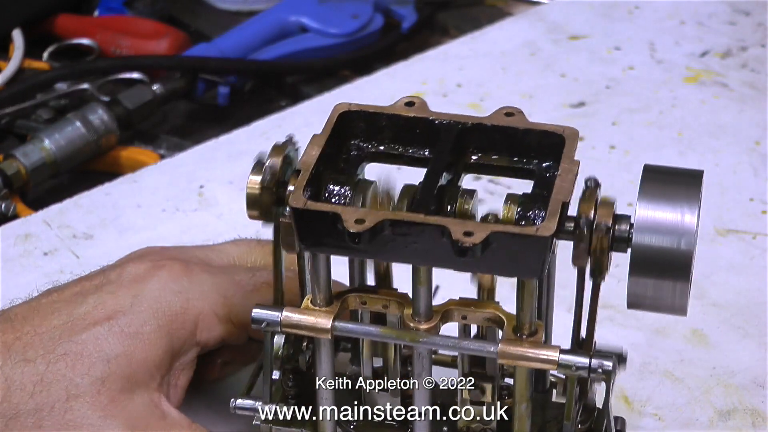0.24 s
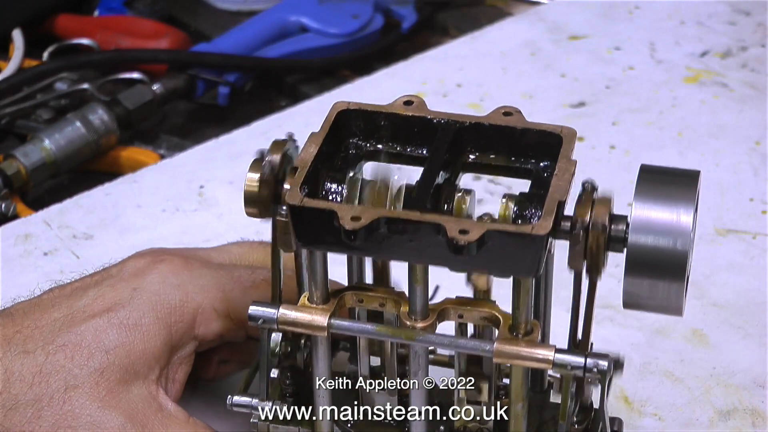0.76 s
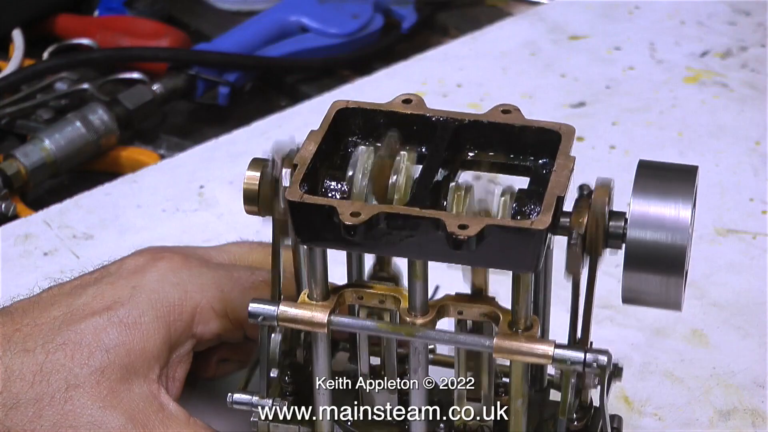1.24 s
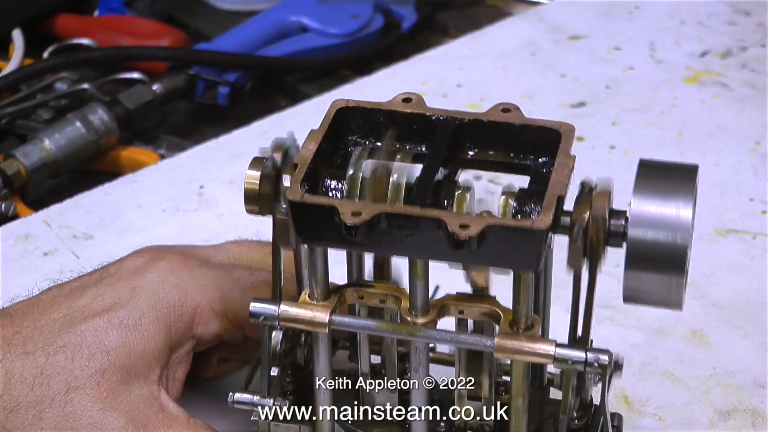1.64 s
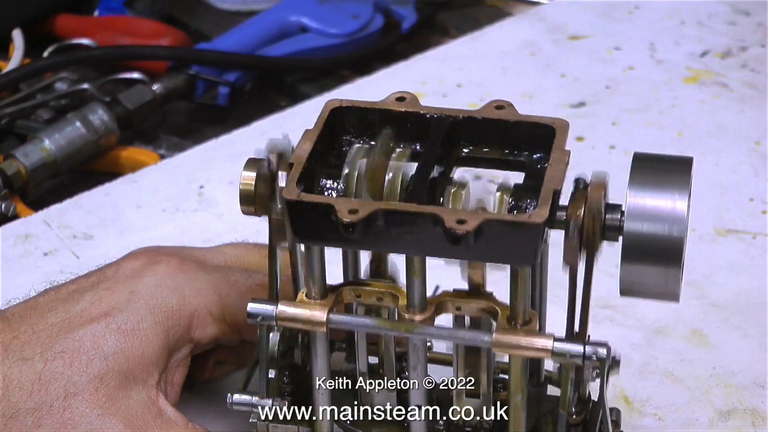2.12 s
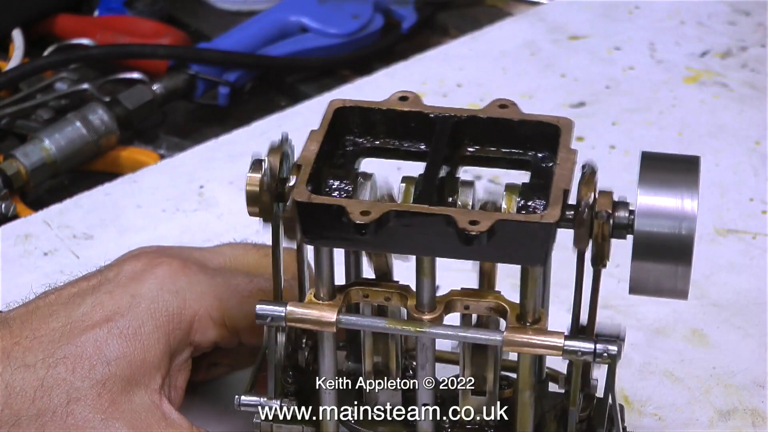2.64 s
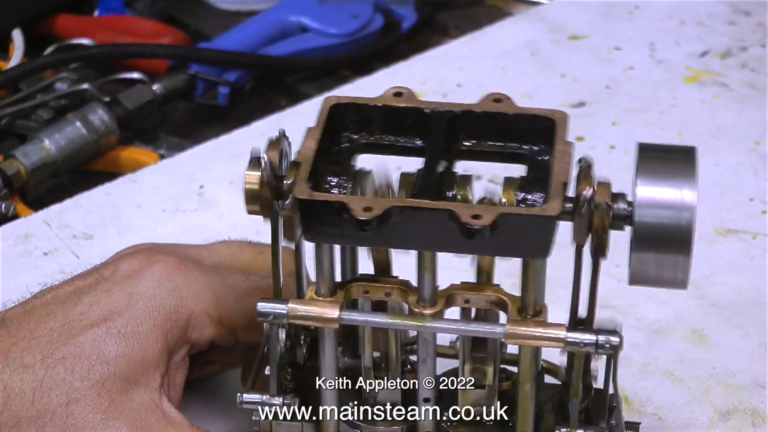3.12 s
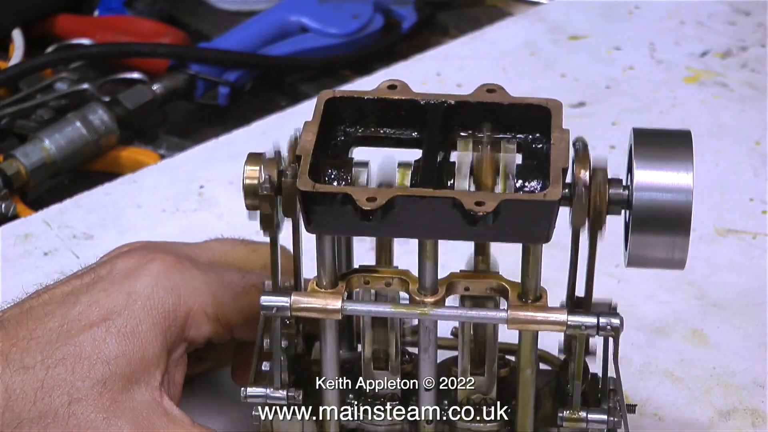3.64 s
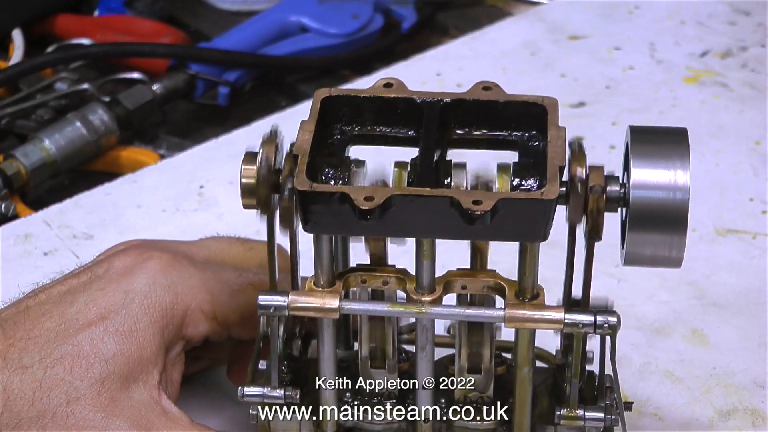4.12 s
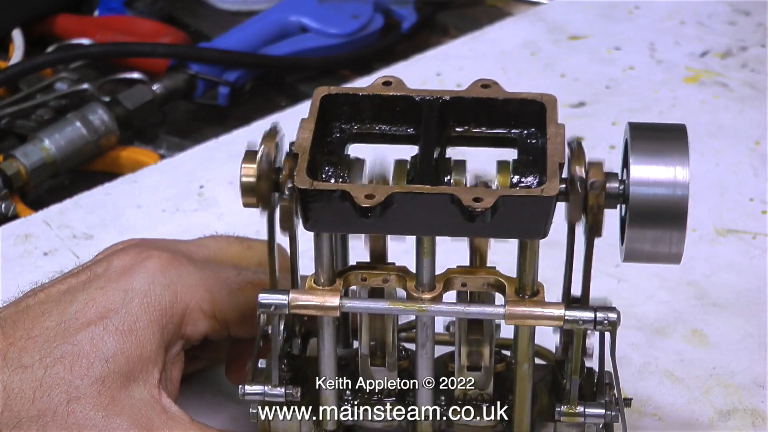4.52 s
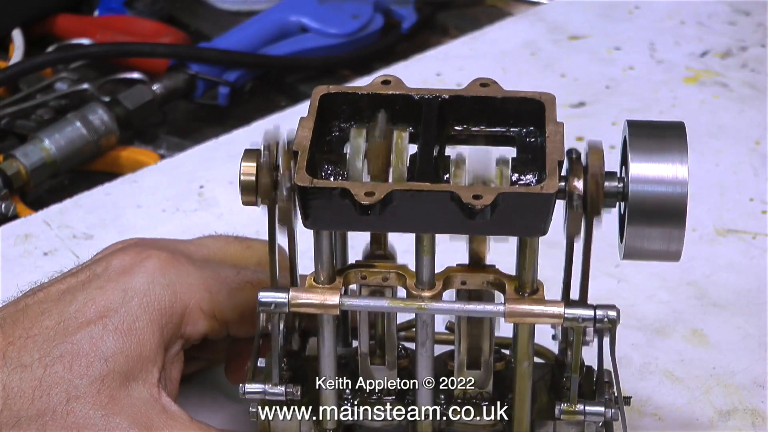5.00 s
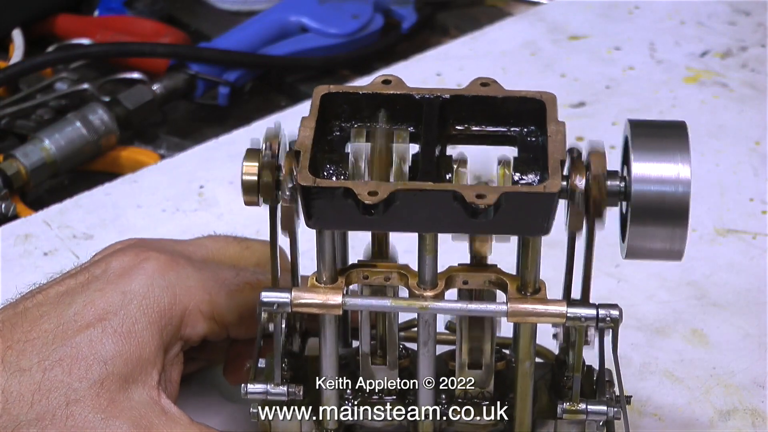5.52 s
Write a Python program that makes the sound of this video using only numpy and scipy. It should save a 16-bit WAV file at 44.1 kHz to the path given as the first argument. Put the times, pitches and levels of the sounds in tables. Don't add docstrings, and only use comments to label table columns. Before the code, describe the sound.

Already running at the start, a model engine spits very fast, bright exhaust puffs over unbroken air hiss, strong and weak beats alternating. Each turn brings two dull bench thumps of changing strength and a brief hollow hoot whose pitch shifts, with a faint thin whistle behind. Close mono pickup in a small workshop, thin in the bass, no start or stop.

```python
import sys
import numpy as np
from scipy import signal
from scipy.io import wavfile
from scipy.ndimage import uniform_filter1d

SR = 44100
rng = np.random.default_rng(int(sys.argv[2]) if len(sys.argv) > 2 else 0)


def linear_from_db(decibels):
    return 10 ** (np.asarray(decibels, float) / 20)


def master(y):
    cut = np.clip(np.atleast_2d(y).T, -1, 1)
    pcm = np.round(cut * 32767)
    wavfile.write(sys.argv[1], SR, pcm.astype(np.int16))


N = 254143


def evened(x):
    return x / np.sqrt(np.mean(x ** 2) + 1e-20)


def add(mix, s, sound):
    at = round(s * SR)
    sound = sound[max(-at, 0):]
    part = mix[max(at, 0):][:len(sound)]
    part += sound[:len(part)]


def resonate(x, hz, width):
    turn = np.exp(2j * np.pi * np.cumsum(hz * np.ones(len(x))) / SR)
    r = np.exp(-np.pi * width / SR)
    return 2 * (turn * signal.lfilter([1 - r], [1, -r], x / turn)).real


def turbulence(points, patchy_db, ripple_db=1.22, stretch=np.ones(N)):
    hz = np.fft.rfftfreq(512, 1 / SR)
    a, b, patches, ripples = rng.standard_normal((N // 128 + 5, 257, 4)).T
    patches = uniform_filter1d(uniform_filter1d(patches, size=6, axis=0), size=8, axis=1)
    ripples = uniform_filter1d(uniform_filter1d(ripples, size=5, axis=0), size=300, axis=1)
    f, db = np.transpose(points)
    at_frames = np.interp(np.arange(a.shape[1]) * 128, np.arange(N), stretch)
    colour = np.interp(np.log((hz[:, None] + 1) / at_frames), np.log(f), db, -90, -90)
    z = (a + 1j * b) * linear_from_db(colour + patchy_db * evened(patches) + ripple_db * evened(ripples))
    return evened(signal.istft(z, nperseg=512, noverlap=384)[1][:N])


def curve(rows, axis, s=np.arange(N) / SR):
    rows = np.array(rows)
    return np.interp(s, rows[:, 0], rows[:, axis])


# t/s, turns completed
CRANK_TURNS = [(0.0, 0), (0.126, 1), (0.243, 2), (0.469, 4), (0.573, 5), (0.98, 9), (1.571, 15),
               (1.862, 18), (2.249, 22), (2.837, 28), (3.323, 33), (3.617, 36), (4.016, 40), (4.42, 44),
               (4.929, 49), (5.341, 53), (5.858, 58)]


def moments(angles):
    s, turns = np.transpose(CRANK_TURNS)
    return np.interp(np.arange(turns[-1])[:, None] + np.array(angles), turns, s)


def overspeed():
    cruise, slowest = 9.995, 9.58
    speed = uniform_filter1d(np.gradient(curve(CRANK_TURNS, axis=1)) * SR, size=20000)
    return np.maximum(speed, slowest) - cruise


# t/s, level/dB
AIR_PRESSURE = [(0, 1.5), (.6, 0.5), (.9, -2), (1.03, 0.5), (1.3, 1.5), (1.45, -2), (1.6, 0), (2.0, -0.5),
                (2.25, 1), (2.42, 0.3), (2.48, -2.5), (2.9, -1), (3.3, 0), (3.6, -0.5), (4.45, -1),
                (4.7, 0), (5.2, 0.5), (5.76, -1)]
# crank angle/turns, jet level/dB
VALVE_OPENINGS = [
    (0.001, -19.5),
    (.282, -24),
    (0.506, -19),
    (.738, -22.5),
]


def valve_beats():
    scatter_db, scatter_s = 0.46, 0.00032
    angles, levels_db = np.transpose(VALVE_OPENINGS)
    s = moments(angles)
    chance = rng.standard_normal(s.shape + (2,))
    db = levels_db + curve(AIR_PRESSURE, axis=1, s=s) + scatter_db * chance[..., 0]
    return np.transpose([(s + scatter_s * chance[..., 1]).ravel(), db.ravel()])


# rise/s, fall/dB per s, roar level/dB, fizz level/dB, sizzle level/dB
EXHAUST_STROKES = [
    (0.0071, 298, 1, 10, -3),
    (0.0054, 350, 4, -7, -1),
    (0.0036, 308, -1, 15, -2.5),
    (0.0069, 302, 1.5, -14, -4),
]


def flow(beats, slower, faster_fall, lead, shut_db, axis=0):
    t, power = np.arange(2400) / SR, np.zeros(N)
    starts = beats[:, 0]
    gaps = np.diff(starts, append=starts[-1] + 0.027)
    for k, ((s, db), gap) in enumerate(zip(beats, gaps)):
        stroke = EXHAUST_STROKES[k % len(EXHAUST_STROKES)]
        rise, fall = slower * stroke[0], faster_fall * stroke[1]
        opening = np.sin(np.pi / 2 * np.clip(t / rise, 0, 1)) ** 2
        emptying_db = -fall * np.maximum(t - rise, 0)
        shutting_db = -shut_db * np.maximum(t - gap + 0.0097, 0) / 0.0084
        colour_db = stroke[axis] if axis else 0
        add(power, s - lead, opening * linear_from_db(2 * (db + colour_db + emptying_db + shutting_db)))
    return power


# f/Hz, level/dB per Hz
JET_SPECTRUM = [(7000, -36), (8500, -15.5), (9340, -1.5), (10200, 1), (12000, -6), (13500, -14.5),
                (16000, -19)]
FIZZ_SPECTRUM = [(12000, -14), (12800, 9.5), (13500, 1), (14200, -11), (14900, 4), (16200, -5)]
SIZZLE_SPECTRUM = [(4000, -31.5), (4800, -11), (5500, -11), (7000, -5.5), (8400, 0.5), (9500, -25)]
ROAR_SPECTRUM = [(530, -31), (900, -18.5), (1310, -9), (1440, -5), (1590, -14), (1740, -3.5), (2030, 1.5),
                 (2880, 3), (3860, -2), (4800, -6.5), (6240, -36), (10600, -120)]
# f/Hz, width/Hz, level/dB
PORT_RINGS = [
    (2204, 120, -25.5),
    (2820, 94, -22.5),
]
# t/s, jet centre f/Hz, jet brightness (-1..1), base plate damping/dB
HAND_ON_FRAME = [(0, 10500, -0.19, 18), (.32, 10450, -0.17, 8), (1.2, 10450, -0.24, 2.5),
                 (2.03, 10270, -0.15, 4), (2.15, 10230, 0.23, 1.5), (2.6, 10180, 0.17, 6.5),
                 (3.2, 10190, 0.068, 6), (3.8, 10350, 0.074, 5.5), (4.48, 10370, 0.14, 16),
                 (5.12, 10370, 0.18, 4), (5.45, 10350, 0.19, 30)]


def exhaust():
    beats, faster = valve_beats(), overspeed()
    leak_db = -34
    flutter = linear_from_db(1.3 * evened(uniform_filter1d(rng.standard_normal(N), size=50)))

    jet = np.sqrt(flow(beats, 0.99, 1.49, 0.002, shut_db=2.5) + linear_from_db(2 * leak_db)) * flutter
    jet_stretch = curve(HAND_ON_FRAME, axis=1) / 10300
    jet = jet * turbulence(JET_SPECTRUM, patchy_db=0.9, stretch=jet_stretch)

    fizz_power = flow(beats, 1.8, 0.92, 0.001, shut_db=-1.0, axis=3)
    fizz = evened(np.sqrt(fizz_power + linear_from_db(2 * (leak_db + 8))))
    fizz = fizz * linear_from_db(-37.5 + 2 * faster) * turbulence(FIZZ_SPECTRUM, patchy_db=2.2)

    bright_hz, bright_width = 12950, 2600
    top = resonate(jet + fizz, bright_hz, bright_width)
    top = resonate(top, bright_hz, 1.1 * bright_width)
    jet = jet + np.clip(curve(HAND_ON_FRAME, axis=2), -1 / 3, 1) * top

    sizzle_power = flow(beats, 0.72, 1.5, 0.0016, shut_db=23.0, axis=4)
    sizzle = evened(np.sqrt(sizzle_power + linear_from_db(2 * (leak_db + 5.5))))
    sizzle = sizzle * linear_from_db(-37.47 + 4 * faster) * turbulence(SIZZLE_SPECTRUM, patchy_db=1.7)

    air = turbulence(ROAR_SPECTRUM, patchy_db=1.67)
    air = air + sum(evened(resonate(air, hz, width)) * linear_from_db(db) for hz, width, db in PORT_RINGS)
    roar_power = flow(beats, 2.34, 0.37, 0.0047, shut_db=11.5, axis=2)
    roar = evened(np.sqrt(roar_power + linear_from_db(2 * (leak_db + 8.5))))
    roar = linear_from_db(-44.23 + 4 * faster) * roar * evened(air)
    return jet + fizz + sizzle + roar


def whine():
    t = np.arange(N) / SR
    lull = uniform_filter1d(1. * ((t > 3.4) & (t < 4.35)), size=8000)
    return linear_from_db(-58.5 - 14 * lull) * evened(resonate(rng.standard_normal(N), 3610, 35))


# t/s, first blow level/dB, second blow level/dB
FRAME_ROCKING = [(0, -46, -54), (.2, -53, -43), (.29, -33, -34), (.42, -30, -43), (.53, -64, -46),
                 (.62, -32.5, -38.5), (1.0, -30.5, -42), (1.13, -36.5, -51), (1.8, -39.5, -41.5),
                 (2.2, -46, -43), (2.3, -43, -33), (2.58, -50, -67), (2.8, -47, -38), (3.08, -38, -42.5),
                 (3.76, -36.5, -46), (4.0, -43.5, -79), (4.77, -34, -36), (5.76, -42, -46)]


def frame_blows():
    scatter_db, scatter_s = (1, 1.5), 0.001995
    s = moments((.49, .805))
    chance = rng.standard_normal(s.shape + (2,))
    first_db = curve(FRAME_ROCKING, axis=1, s=s[:, 0])
    second_db = curve(FRAME_ROCKING, axis=2, s=s[:, 1])
    db = np.transpose([first_db, second_db]) + np.array(scatter_db) * chance[..., 0]
    return np.transpose([(s + scatter_s * chance[..., 1]).ravel(), db.ravel()])


# f/Hz, level/dB, time to fall 60 dB/s
BENCH_TONES = [
    (300, -28.5, 0.056),
    (373.5, 0, 0.028),
    (450.5, 1.5, 0.016),
    (560, -11, 0.05),
]
# f/Hz, level/dB per Hz
RATTLE_SPECTRUM = [(35, -79), (60, -46), (188, -16), (252, -26), (363, 6.5), (511, -5.5), (694, -4.5),
                   (899, -25), (1000, -45), (1300, -44), (2200, -120)]


def frame():
    blows, t = np.zeros(N), np.arange(3000) / SR
    push, thumps = np.hanning(40), frame_blows()
    for (s, db), chance in zip(thumps, rng.standard_normal((len(thumps), 2))):
        add(blows, s - .004, linear_from_db(db) * push)
        rebound_s = s + 0.00576 + 0.0012 * chance[0]
        add(blows, rebound_s, linear_from_db(db - 11 + 1.44 * chance[1]) * push)
    ring = sum(linear_from_db(db - 60 * t / t60) * np.sin(2 * np.pi * hz * t) for hz, db, t60 in BENCH_TONES)
    soft_start = np.minimum(t / 0.0048, 1)
    knocks = signal.oaconvolve(blows, ring * soft_start)[:N] / push.sum()

    shaking = evened(signal.oaconvolve(blows, t / .012 * np.exp(-t / 0.0062))[:N])
    jolts = shaking / uniform_filter1d(shaking, size=9000)
    plate = evened(resonate((.5 + 0.32 * jolts) * rng.standard_normal(N), 363, 15.0))
    plate = linear_from_db(-53.5 - curve(HAND_ON_FRAME, axis=3)) * plate
    rattle = evened((1.6 + 0.25 * jolts) * turbulence(RATTLE_SPECTRUM, patchy_db=2.5))
    return linear_from_db(4.0) * knocks + plate + linear_from_db(-58 - 7 * overspeed()) * rattle


# start t/s, end t/s, level/dB, f/Hz
CHAMBER_SPELLS = [(.65, .92, -43, 1740), (1.05, 1.4, -42, 1715), (1.55, 1.7, -39.5, 1910),
                  (2.22, 2.48, -37, 1860), (2.52, 2.78, -37.5, 1775), (2.92, 2.97, -39.5, 2150),
                  (3.1, 3.26, -37, 1870), (3.41, 3.46, -36.5, 1960), (3.7, 3.85, -38.5, 1940),
                  (4.0, 4.46, -37.5, 1950), (4.6, 4.76, -39.5, 2160), (4.92, 5.06, -37.5, 1810),
                  (5.43, 5.48, -38, 1950), (5.64, 5.7, -44, 1780)]


def hoot_beats():
    scatter_db, detune = 1.2, .035
    s = moments([.11])[1:, 0]
    db, hz = np.full(len(s), -41.5), np.full(len(s), 1440.0)
    chance = rng.standard_normal((len(s), 2))
    for start, end, spell_db, spell_hz in CHAMBER_SPELLS:
        during = (s > start) & (s < end)
        db = np.where(during, spell_db, db)
        hz = np.where(during, spell_hz * (1 + detune * chance[:, 1]), hz)
    return np.transpose([s, db + scatter_db * chance[:, 0], hz])


def hoots():
    rows = hoot_beats()
    out, puffs = np.zeros(N), rng.standard_normal((len(rows), 2, 1400))
    t = np.arange(1400) / SR - .014
    swell = np.exp(-.5 * (t / 0.0038) ** 2)
    for (s, db, hz), pair in zip(rows, puffs):
        for puff, early, weaker_db in zip(pair, (0, .031), (0, -7.0)):
            chamber = evened(resonate(resonate(puff, hz, 115), hz, 115) * swell)
            passage = evened(resonate(resonate(puff * swell, 1470, 170), 1470, 210))
            spit = evened(resonate(resonate(puff, 1800, 700), 1800, 700) * swell)
            passage_gain = linear_from_db(-4.0 + 3.9 * puff[0])
            hoot = chamber + passage_gain * passage + linear_from_db(3.0) * spit
            add(out, s - early - .014, linear_from_db(db - 13 + weaker_db) * hoot)
    return out


def workshop(x):
    at = np.arange(150, 12000, 20) + rng.integers(0, 20, 593)
    taps = np.zeros(12100)
    taps[at] = rng.choice([-1., 1.], len(at)) * linear_from_db(-60 * at / SR / 0.11)
    return signal.fftconvolve(x, taps / np.linalg.norm(taps))[:N]


def scene():
    engine = exhaust() + whine() + frame() + hoots()
    return (engine + linear_from_db(-17.5) * workshop(engine))[None]


def low_pass(x):
    return signal.sosfilt(signal.butter(12, 16740, fs=SR, output="sos"), x)


def record(dry):
    ceiling = .6
    rounded = ceiling * np.tanh(dry / ceiling)
    cut = signal.sosfilt(signal.butter(4, 235, "high", fs=SR, output="sos"), rounded)
    cut = cut - 0.36 * resonate(cut[0], 925, 140)
    cut = cut + linear_from_db(-90.5) * evened(resonate(rng.standard_normal(N), 135, 50))
    edge = signal.firwin(1501, 15790, window=("kaiser", 10), fs=SR)
    return low_pass(signal.oaconvolve(cut, edge[None], "same"))


dry = scene()
out = record(dry)
master(out)
```